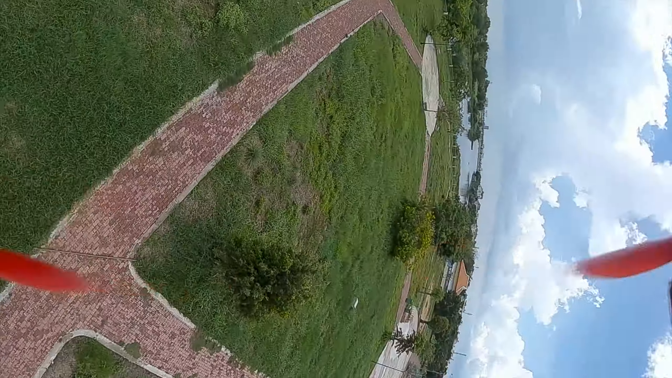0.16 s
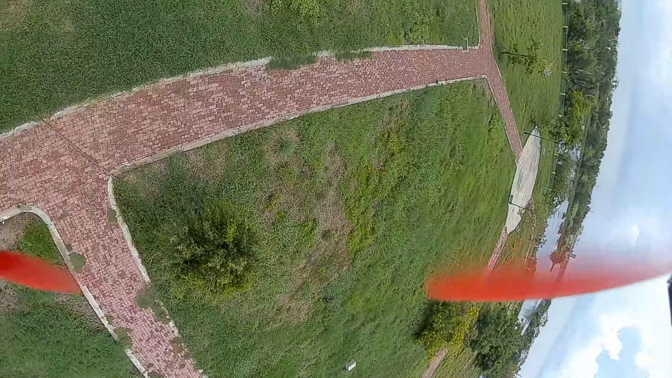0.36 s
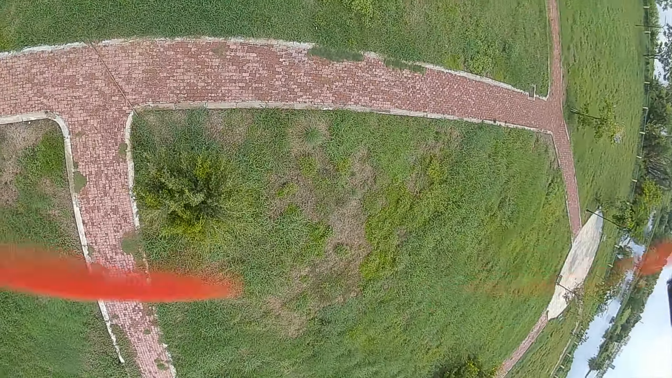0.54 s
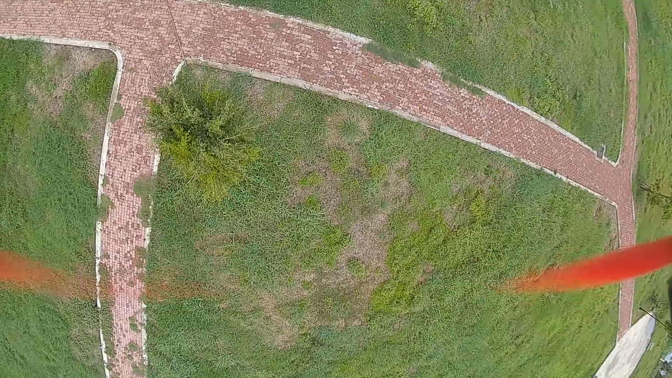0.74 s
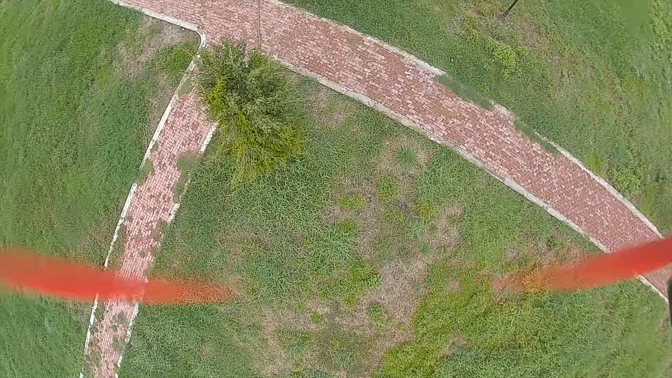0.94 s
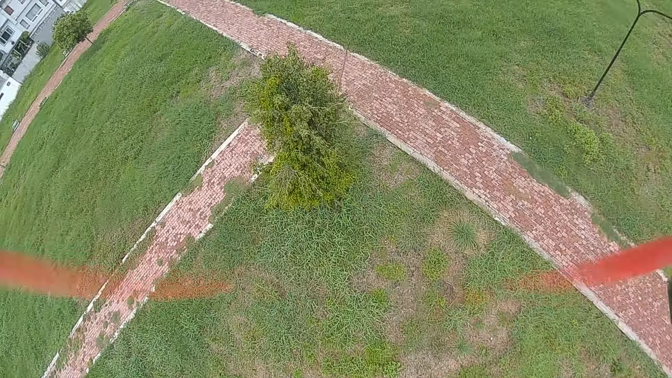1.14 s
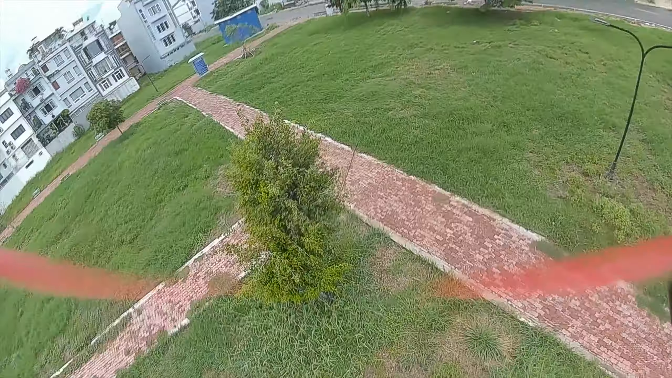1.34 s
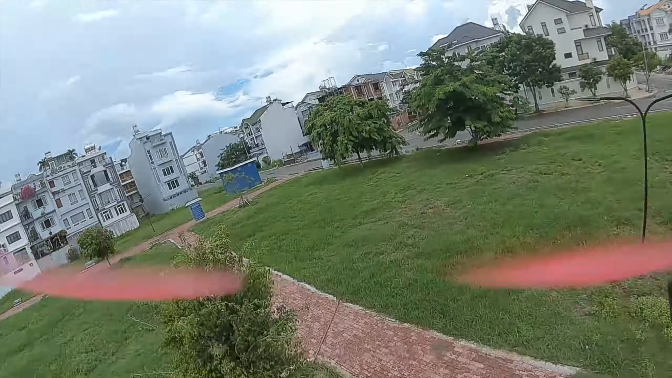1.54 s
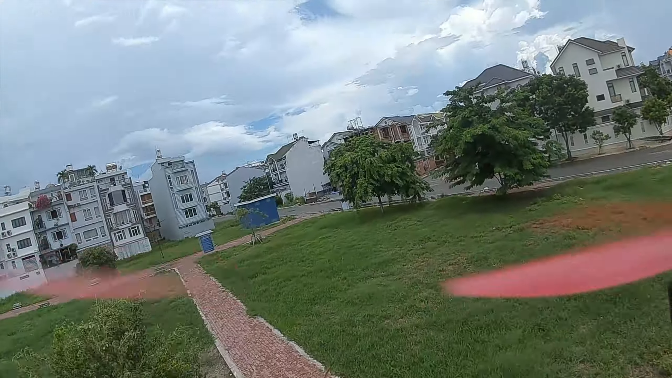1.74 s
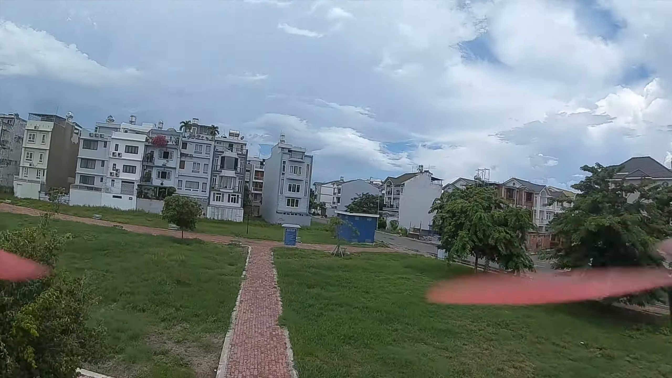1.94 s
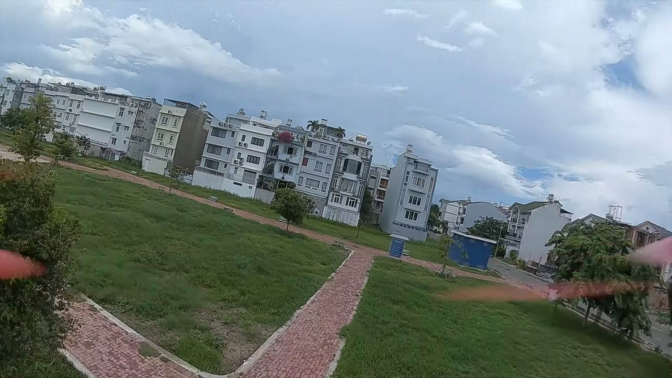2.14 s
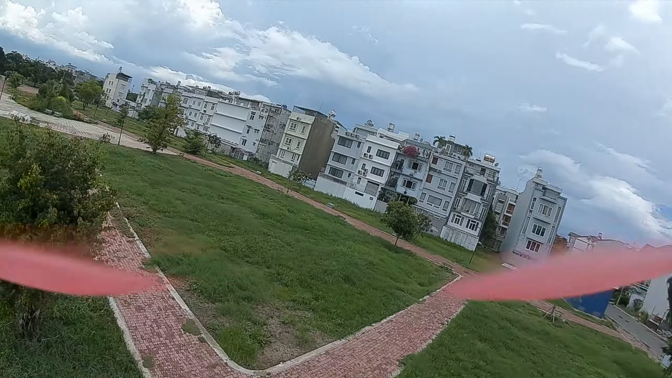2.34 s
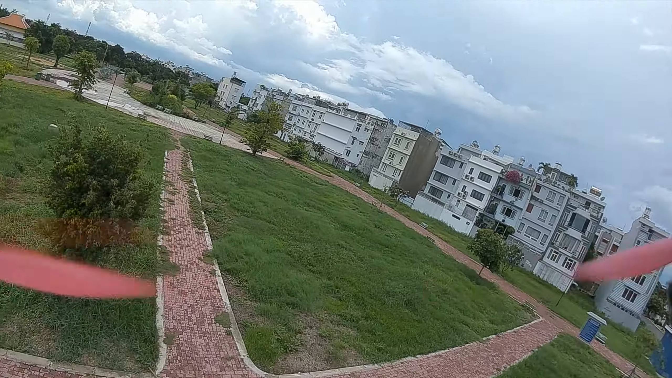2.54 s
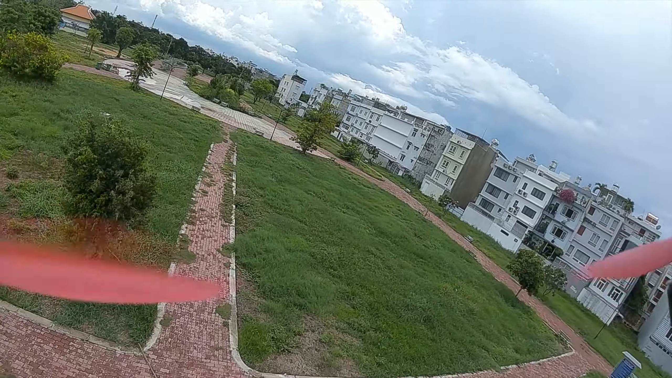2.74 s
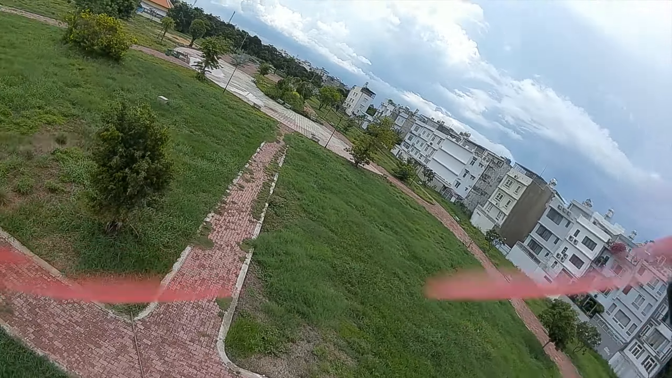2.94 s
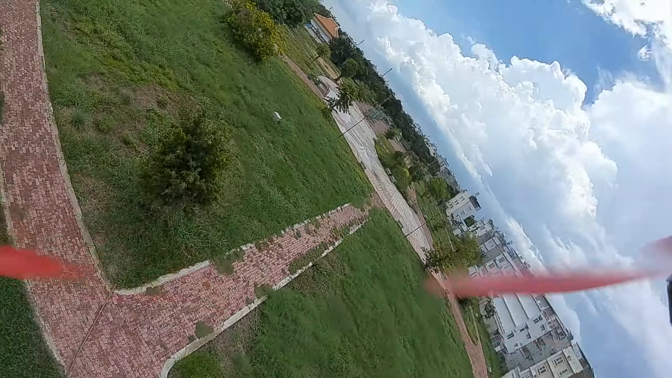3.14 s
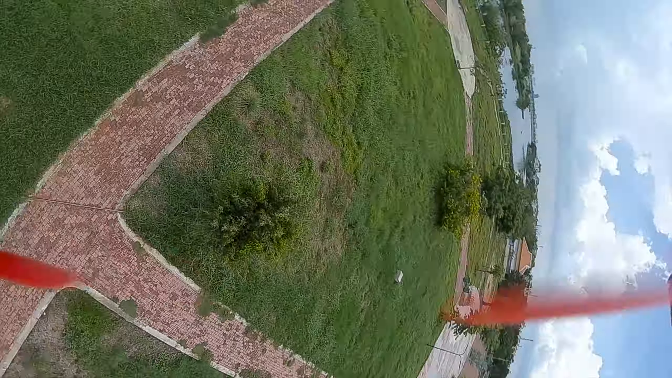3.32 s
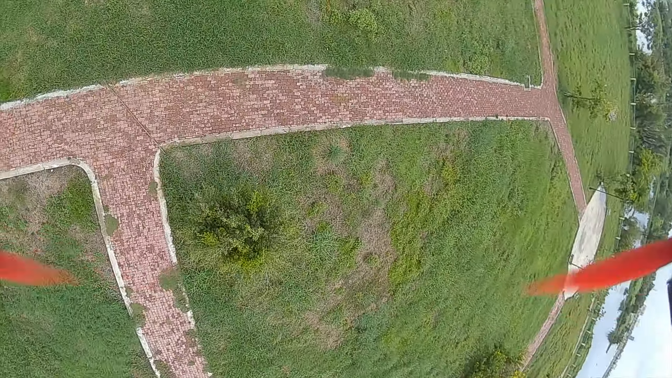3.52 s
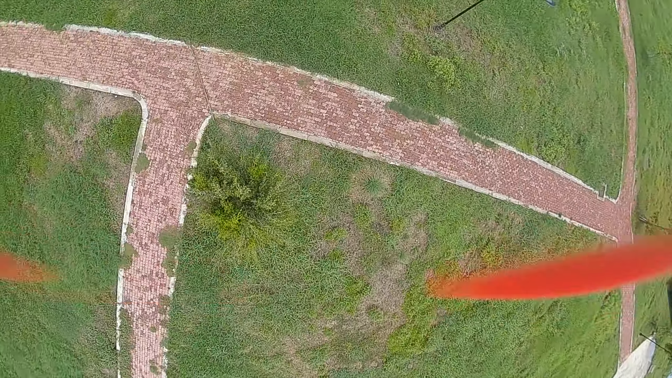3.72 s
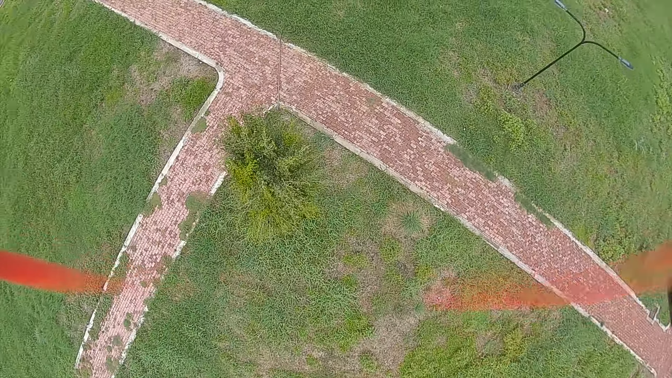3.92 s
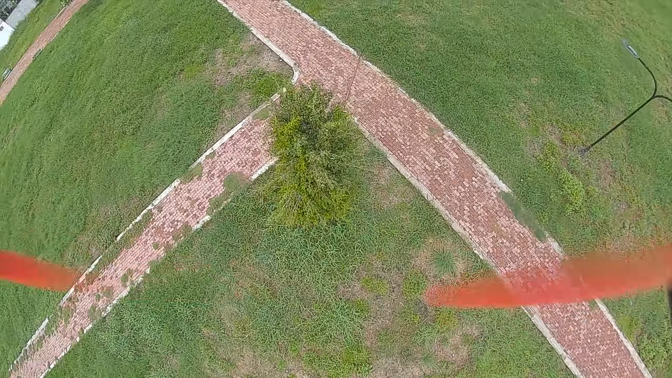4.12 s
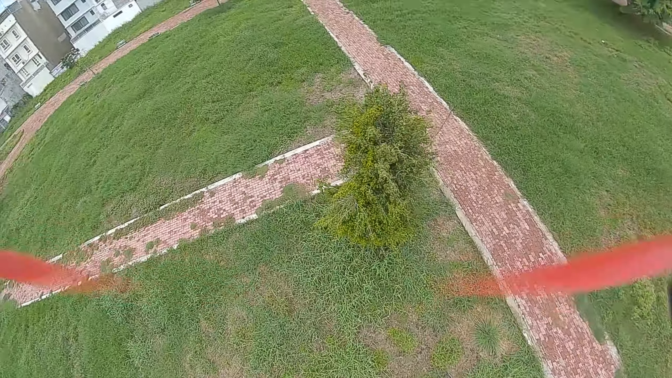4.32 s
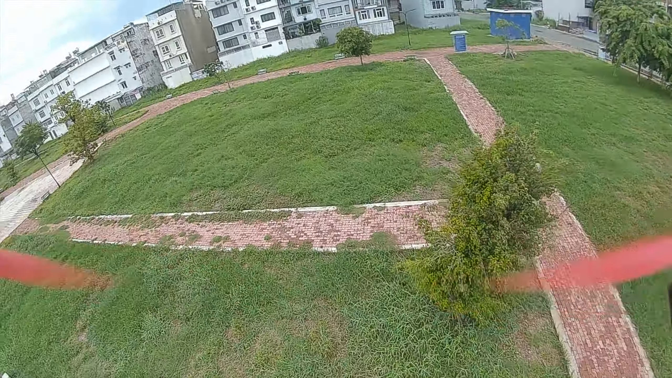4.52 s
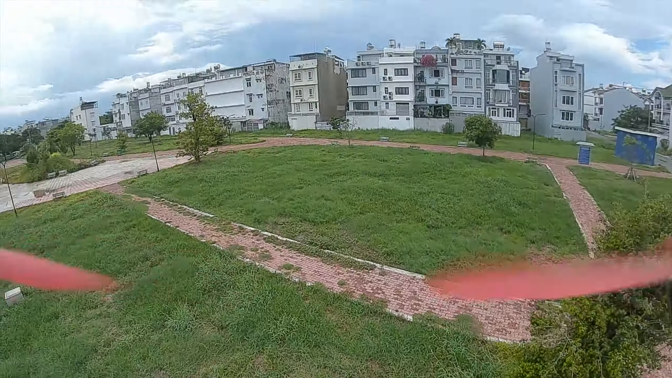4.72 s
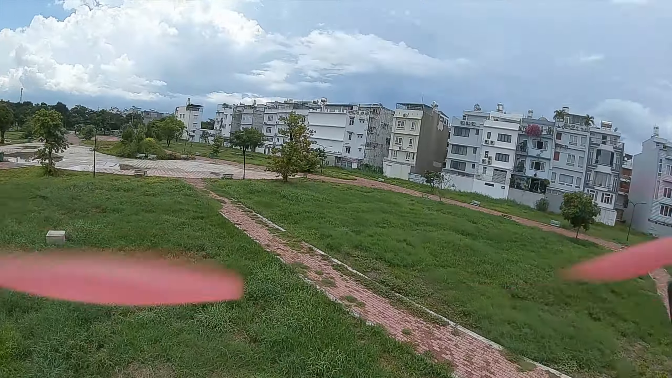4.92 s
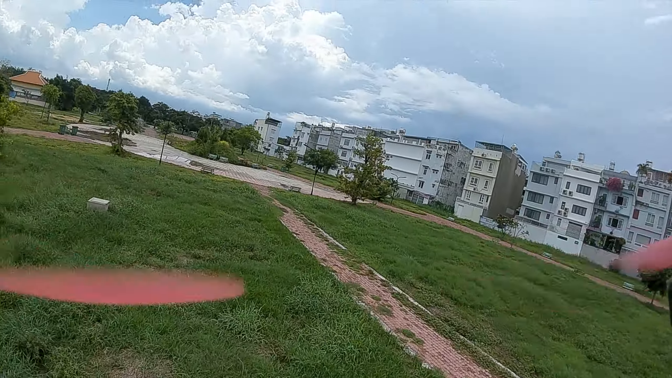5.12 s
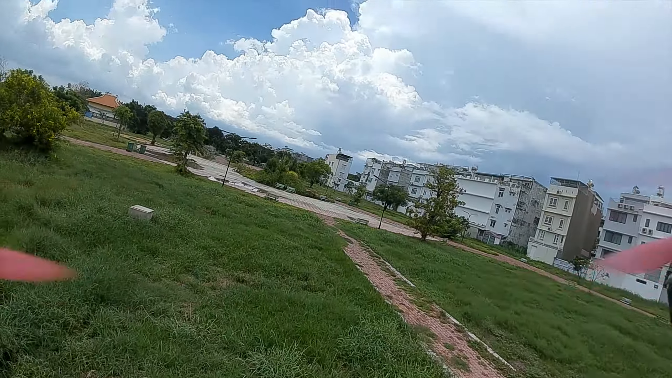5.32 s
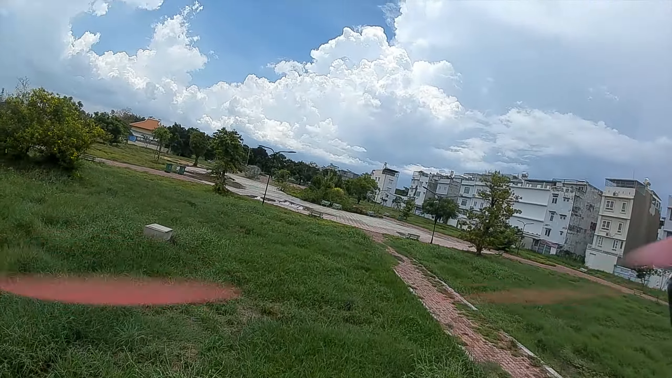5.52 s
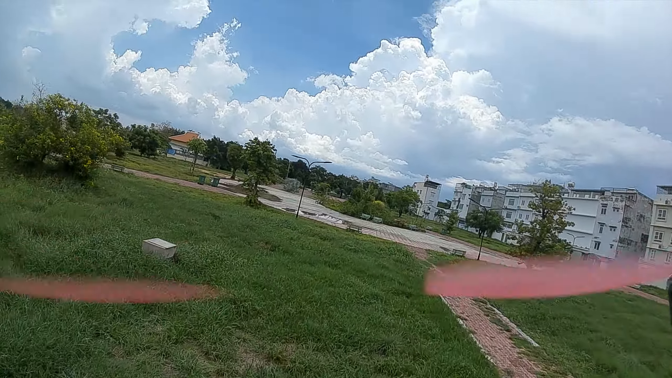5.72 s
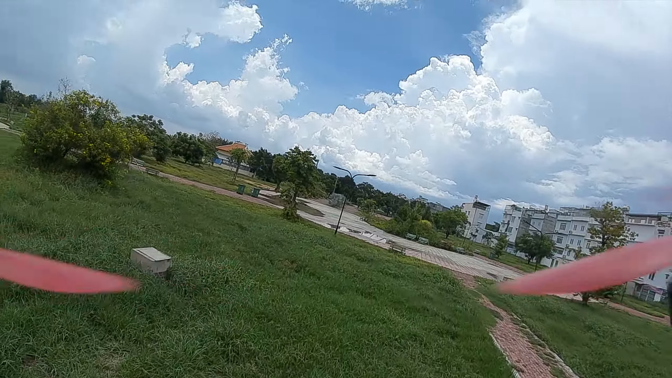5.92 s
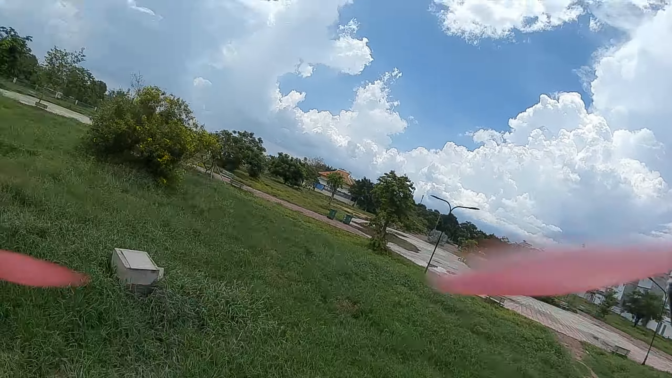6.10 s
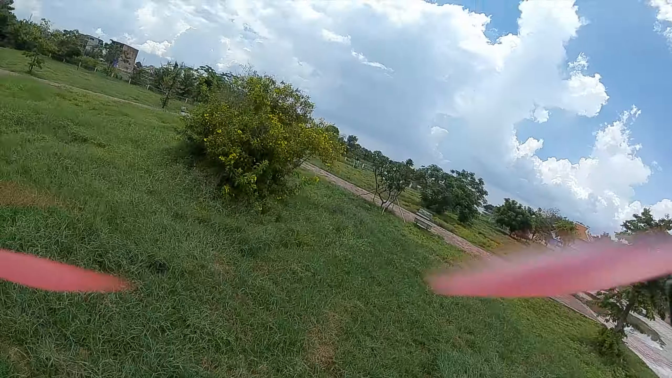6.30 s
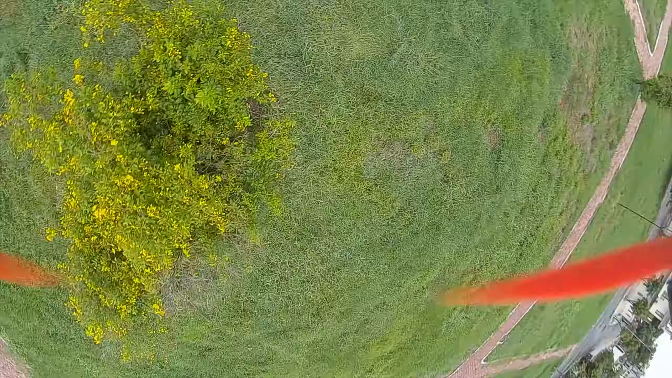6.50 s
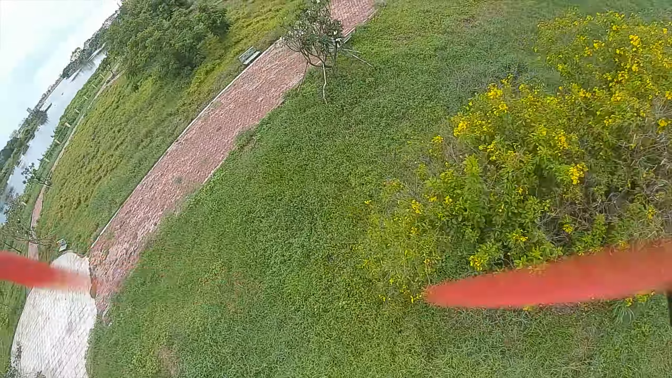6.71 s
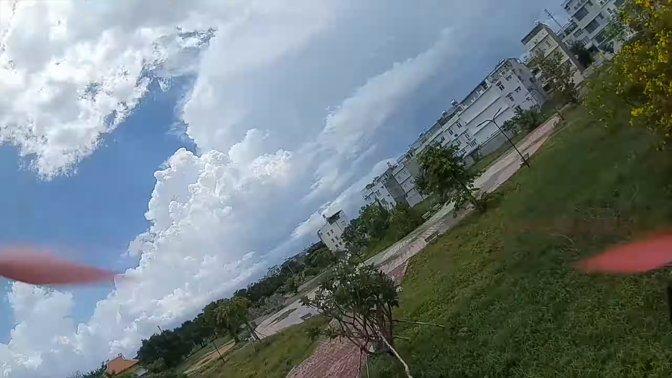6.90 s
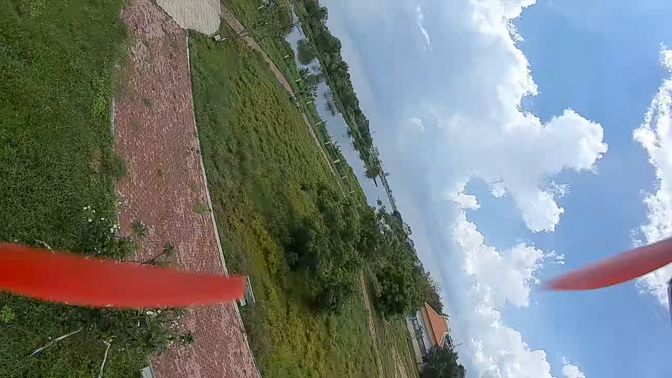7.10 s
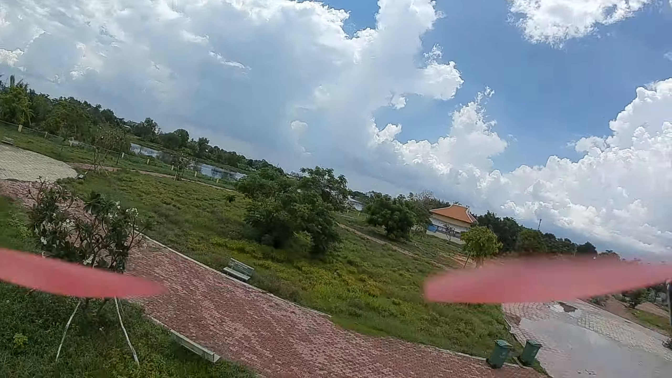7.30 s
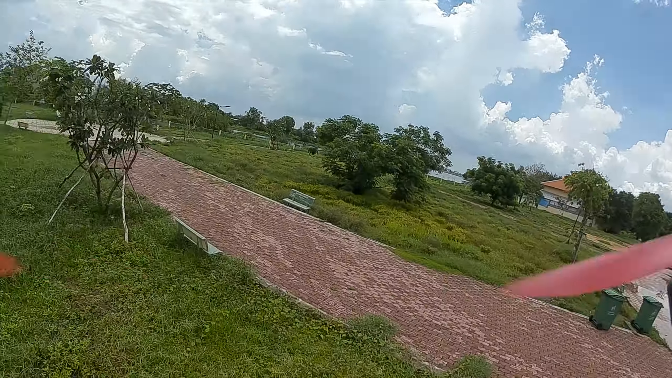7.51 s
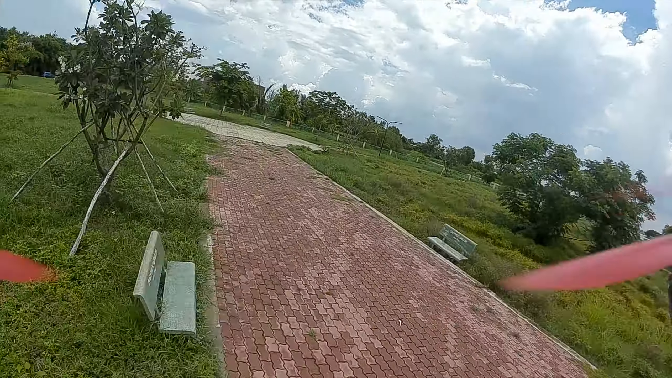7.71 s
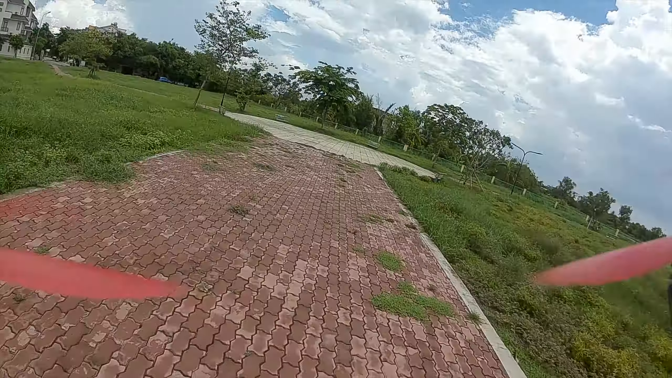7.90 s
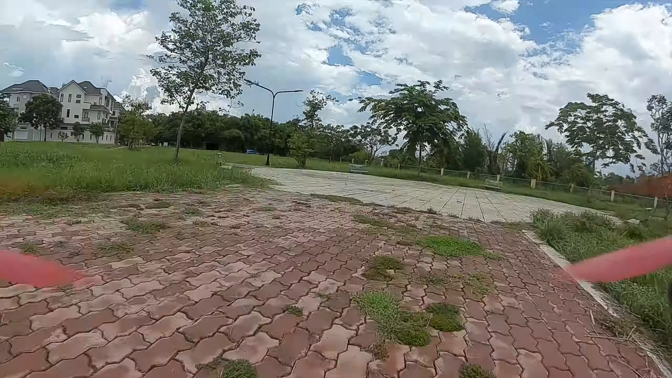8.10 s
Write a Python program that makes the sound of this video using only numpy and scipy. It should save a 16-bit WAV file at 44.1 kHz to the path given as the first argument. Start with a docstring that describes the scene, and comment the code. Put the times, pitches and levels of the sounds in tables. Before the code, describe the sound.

A small racing drone's propellers whine and roar, heard from on board, surging through loops, then suddenly shrilling two octaves higher in a sped-up finish.

```python
"""A small racing quadcopter flies loops round a park, heard from the camera on its own frame.
From the start, four propellers in a faster and a slower pair drone, summed from sine waves that follow the motors.
Each push on the throttle sweeps them up; shaped noise makes the roar and hiss, rougher with steering,
and ticks, low blasts, wind and a thin motor whine join in. Near the end the flight runs at four times
the pace: the motor tones, the frame resonances and the colours of the noise then lie two octaves up."""
import sys
import numpy as np
from scipy import signal
from scipy.fft import rfft, irfft, next_fast_len
from scipy.io import wavfile
from scipy.ndimage import map_coordinates

SR = 44100
rng = np.random.default_rng(int(sys.argv[2]) if len(sys.argv) > 2 else 0)


def to_wav(sig):
    """Store sig (one row per channel, or 1-D mono) as 16-bit WAV at the path in sys.argv[1].

    Samples outside -1..1 are clipped; the rate is SR.
    """
    pcm = np.clip(np.atleast_2d(sig), -1, 1) * 32767
    pcm = np.round(pcm).astype(np.int16)
    wavfile.write(sys.argv[1], SR, pcm.T)  # frames by channels


N = 359415

HURRY_S, HURRY_PACE = 6.143, 4  # when the flight speeds up, and how many times faster it then runs
TIME = np.arange(N) / SR  # seconds
PACE = np.where(TIME < HURRY_S, 1, HURRY_PACE)
FLOWN = np.cumsum(PACE) / SR  # seconds of flight
TOP_HZ = 15800  # upper band limit

# All motor speeds below are those at normal pace. The noise spectra give only the shape, not the loudness.
# Gliding and cruising between pushes. Each row: time in seconds, faster pair in turns per second,
# slower pair in turns per second, blade load in dB.
CRUISE = [(0, 185, 120, 8), (.36, 190, 116, -0.5), (.5, 240, 127, -1), (.82, 207, 154, -0.5),
          (.93, 246, 215.6, -3.5), (1.65, 220, 186, 5.5), (1.8, 212, 119, 3), (1.99, 192, 128, 5.5),
          (2.7, 166, 140.4, 0), (2.9, 164, 122, -1.5), (3.0, 235, 194, 7), (3.36, 267, 135, 3.5),
          (3.45, 227, 115, -2.5), (3.5, 135, 69, 1.5), (3.54, 133, 99, -4), (3.715, 138, 94, -4),
          (3.745, 174, 108.5, -1.5), (4.2, 173, 121, 0.5), (4.48, 251, 195, -3.5), (5.12, 233, 170, 2),
          (5.93, 127, 120, 3), (6.34, 141, 129, 3), (6.57, 126, 90, -2), (6.74, 162, 107, -5),
          (6.8, 164, 126, 2), (6.87, 172, 155, 3), (7.05, 243, 129, 3.5), (7.095, 131, 83, -3.5),
          (7.352, 130, 86, -5.5), (7.405, 190, 169, -7), (7.56, 115, 109, 0.5), (7.63, 152, 147, -1.5),
          (7.75, 159, 146, -2), (7.89, 112, 108, 3.5), (7.95, 151, 143, 2.5), (8.15, 153, 154, 8)]
CRUISE_SHARE = 0.34  # the faster pair's share of the power while cruising, 0-1
# Pushes on the throttle. Each row: time of the top in seconds, rise in seconds, fall in seconds, flatness of
# the top (no unit), faster pair in turns per second, slower pair in turns per second, blade load in dB,
# the faster pair's share of the power from 0 to 1, extra turbulence on a 0-1 scale.
PUSHES = [(0.15, .15, .15, 1.98, 283, 237, 1, 0.5, 0.28), (0.0, .1, .15, 1.51, 406, 329, 4.5, 1, -0.19),
          (1.62, 0.45, 0.17, 1.74, 351, 336, 1, .58, -0.11),
          (2.53, .62, .19, 2.8, 231, 198, 4, 0.44, -0.075),
          (3.13, .215, 0.19, 3.08, 387, 300, 0, 0.94, -0.3024),
          (3.427, 0.024, 0.058, 2.46, 269, 129, 6, .55, -.3),
          (4.72, .26, 0.38, 5.75, 274, 218.7, -0.5, 0.21, -0.13),
          (5.09, .13, .14, 3.95, 235, 169.4, 0.5, .12, -.32), (5.3, .17, .74, 1.42, 259, 224, 0, 0, -0.198),
          (5.3, .14, .2, 4, 266, 233, 1, .02, -.1), (6.2, 0.24, .15, 2.91, 182, 165.5, 1.5, 0.3, -0.15),
          (6.433, .063, 0.066, 3.08, 408, 304, 3, .92, -.35),
          (6.545, .018, .022, 1.6, 265, 152, 5.5, 0.42, -.1),
          (6.988, .132, .052, 2.6, 393, 305, 3, 0.87, -.1),
          (7.444, .046, .056, 3.35, 286, 264, 0, 0.42, 0.022),
          (7.685, 0.066, 0.067, 3, 254, 247, 0.5, 0.77, -0.044),
          (8.1, .13, .2, 2.7, 206, 190, 1.5, 0.41, -0.024)]
# The level dips or swells briefly. Each row: time in seconds, change of blade load in dB.
LURCHES = [(.1, -7.5), (1.25, 3.5), (1.88, -7.5), (2.55, 4), (3.402, -1.5), (4.495, -3.5), (4.71, 5),
           (5.005, 2.5), (5.225, 2.5), (5.63, -5), (5.835, -4), (6.13, 4.5), (6.4, 2), (6.512, 2.5),
           (6.865, -3.5), (7.5, -4.5)]
LURCH_S = 0.014  # half-length in seconds
# Faster blades are louder. Each row: mean speed in turns per second, thrust in dB, blade hiss in dB
# (both before steering, load and the trims of each layer).
LOUDNESS = [(102, -39.5, -46), (120.8, -26, -48), (178, -22.5, -43.5), (214.5, -20, -39.5),
            (255.4, -13, -32), (345, -13.5, -29), (415, -16, -44.5)]
# Steering is the gap between the pairs as a share of the faster one's speed.
# It unloads the blades and throws them into their own wake.
STEER_THRUST_DB, STEER_HISS_DB = -14.5, -8.5  # change at a gap of 1
CALM_TURBULENCE, STEER_TURBULENCE = 0.1123, 1.45  # turbulence 0-1 at no gap, and its growth with the gap
HISS_FOLLOWS_LOAD = 0.9  # dB of hiss per dB of blade load
# Tones of one propeller. Each row: multiple of the shaft speed, relative level in dB.
ORDERS_DB = [(1, -2.5), (2, 2), (3, -3), (4, -3), (5, -10.5), (6, -13), (7, -17), (8, -16), (9, -21.5),
             (10, -18.5), (12, -15.5)]
# Path through the frame and camera case. Each row: frequency in Hz at normal pace, gain in dB.
BODY = [(60, -19), (100, -14.5), (125, -12.5), (150, -14.5), (180, -19.5), (225, -12), (255, -12.5),
        (295, 4), (375, -3.5), (450, 0.5), (560, -0.5), (680, 0), (830, -7.5), (1020, -2), (1200, -4.5),
        (1400, -11.5), (1600, -9), (2500, -20), (5000, -24)]
CLEAN_EDGE_DB = 2.6  # dB per octave gained by the upper orders in clean air, lost in full turbulence
# Blade hiss at low throttle rings in the case. Each row: frequency in Hz, relative level in dB per Hz.
SOFT_HISS = [(1000, -24.5), (2000, -1), (2350, -4), (2600, -1.5), (2950, 5), (3500, 1.5), (4000, -10.5),
             (4500, -2.5), (5000, -11), (5600, -2.5), (6700, -9), (7500, -16.5), (9500, -19.5),
             (11000, -10.5), (12300, -23), (15500, -25)]
# Blade hiss at high throttle. Each row: frequency in Hz, relative level in dB per Hz.
HARD_HISS = [(900, -26), (1700, 8), (2400, 0), (3200, -1), (3900, -2), (5600, 1.5), (6600, -3),
             (7500, -10.5), (9700, -6), (11200, -11), (12500, -15), (15500, -17.5)]
# Churned air. Each row: frequency in Hz, relative level in dB per Hz.
WASH = [(15, -75), (60, -47), (250, -5), (380, -24.5), (520, 1), (720, -0.5), (850, 2.5), (1050, -1.5),
        (1400, -7.5), (2000, -15.5), (3500, -40), (8000, -70)]
# Blades striking their own wake. Each row: frequency in Hz, relative level in dB per Hz.
WAKE = [(8, -80), (30, -41), (100, -20), (170, -31), (215, -12), (280, 9), (380, 1.5), (520, 5),
        (700, -4.5), (1000, -27.5), (1500, -33), (3000, -60), (6000, -70)]
WHINE_DB, SQUEAL_S = -63, 0.026  # gain of the whine before its wobble and filter; half-length of a squeal in s
# The whine flares as the motors brake. Each row: time in seconds, dB over the usual.
SQUEALS = [(3.358, 25.5), (3.425, 16)]
# How the case passes the whine. Each row: frequency in Hz, gain in dB.
WHINE_CASE = [(2500, -10), (3800, -4), (4500, -6), (5000, 3), (5600, 7.5),
              (6400, -17), (7400, -11), (8300, -8), (11000, -11), (15000, -20)]
# Loud sharp ticks in the frame. Each row: time in seconds, strength in dB before a trim.
TICKS = [(0.019, -8.5), (0.0648, -21), (0.1421, -12.5), (1.4254, -20), (1.479, -17), (1.6811, -9.5),
         (2.9667, -20), (3.1488, -7.5), (5.4634, -24)]
# Colour of the ticks. Each row: frequency in Hz, relative level in dB per Hz.
TICK_COLOUR = [(1500, -32), (4000, -17), (5600, 1), (7500, -6.5), (10500, -3), (12500, -17), (15500, -20)]
# Low blasts as the craft drops through its own wake. Each row: time in seconds, level in dB.
BLASTS = [(.03, -14.5), (.165, -16.5), (3.0, -28), (3.156, -17), (3.255, -20.5)]
BLAST_S = 0.032  # half-length in seconds
# Colour of a blast. Each row: frequency in Hz, relative level in dB per Hz.
BLAST = [(60, -49), (150, -32.5), (200, -3.5), (270, 18.5), (330, 8), (450, -22), (1000, -60)]
# Air on the microphone. Each row: time in seconds, level in dB before a trim and a wobble.
WIND = [(0, -46), (.16, -62), (.72, -46), (1.3, -61), (1.45, -53), (1.77, -82), (2.36, -52.5), (2.88, -54),
        (3.33, -61), (3.75, -58), (4.18, -52), (4.47, -50.5), (5.22, -52), (5.67, -81), (6.14, -60),
        (6.3, -69), (7.0, -53.5), (7.25, -66), (7.42, -53.5), (7.56, -90), (8.15, -88)]
# Colour of the wind. Each row: frequency in Hz, relative level in dB per Hz.
RUMBLE = [(5, -25), (15, -21), (35, -0.5), (70, -1.5), (120, 9), (250, -9), (600, -50)]
# Narrow ring of the camera case. Each row: frequency in Hz, relative level in dB per Hz.
CASE_RING = [(500, -27), (900, -9), (1030, -2), (1130, -13), (1700, -30), (4000, -70)]


def amp(db):
    """Turn decibels into a gain."""
    return np.exp(np.asarray(db) * np.log(10) / 20)


def unit(x):
    """Scale x to an rms (average strength) of 1."""
    return x / np.sqrt(np.mean(x ** 2) + 1e-20)


def along(points, hz):
    """Read a value between (Hz, value) points on a log axis."""
    f, v = np.transpose(points)
    return np.interp(np.log(hz + 1), np.log(f + 1), v)


def curves(rows):
    """Give one value per sample for each column after the time."""
    s, *cols = np.transpose(rows)
    return [np.interp(TIME, s, c) for c in cols]


def bumps(rows, width_s):
    """Add up a bell-shaped rise or dip for each (seconds, height) row."""
    return sum(height * np.exp(-((TIME - s) / width_s) ** 2) for s, height in rows)


def wobble(rate):
    """Draw a smooth random curve of rms 1 through `rate` random points per second of flight."""
    knots = rng.standard_normal(int(FLOWN[-1] * rate) + 4)
    s = np.linspace(0, FLOWN[-1], len(knots) * 4)
    smooth = map_coordinates(knots, [s * rate])
    return unit(np.interp(FLOWN, s, smooth))


def filtered(x, response):
    """Multiply the spectrum of x by a response that depends on frequency."""
    m = next_fast_len(N + SR // 4)
    spectrum = rfft(x, m) * response(np.fft.rfftfreq(m, 1 / SR))
    return irfft(spectrum, m)[:N]


def rush(spectrum):
    """Make noise of about rms 1 whose spectrum moves up with the pace."""
    m = next_fast_len(N)
    white, hz = rfft(rng.standard_normal(m)), np.fft.rfftfreq(m, 1 / SR)

    def at_pace(pace):
        shaped = irfft(white * amp(along(spectrum, hz / pace)), m)[:N]
        return shaped / np.sqrt(pace)  # the wider band would be stronger

    slow, fast = at_pace(1), at_pace(HURRY_PACE)
    return np.where(PACE == 1, slow, fast) / np.std(slow)


def flight():
    """Motor speeds, blade load, share and extra turbulence: a push arches from the cruise to its top and back."""
    state = np.array(curves(CRUISE) + [np.full(N, CRUISE_SHARE), np.zeros(N)])
    for s, rise, fall, flatness, *top in PUSHES:
        near = (TIME > s - rise) & (TIME < s + fall)
        away = np.maximum((s - TIME[near]) / rise, (TIME[near] - s) / fall)  # 0 at the top, 1 at the ends
        arch = (1 - away ** flatness) ** 2
        state[:, near] += arch * (np.array(top)[:, None] - state[:, near])
    return state


def effort(fast, slow, load_db, stir):
    """Thrust dB, hiss dB and turbulence follow from the mean motor speed, the steering and the blade load."""
    speed, steering = (fast + slow) / 2, np.abs(fast - slow) / fast
    revs, thrust_law, hiss_law = np.transpose(LOUDNESS)
    thrust_db = np.interp(speed, revs, thrust_law) + STEER_THRUST_DB * steering + load_db
    hiss_db = np.interp(speed, revs, hiss_law) + STEER_HISS_DB * steering + HISS_FOLLOWS_LOAD * load_db
    rough = np.clip(CALM_TURBULENCE + STEER_TURBULENCE * steering + stir, 0, 1)
    return thrust_db, hiss_db, rough


def shaft(speed, drift, drift_rate, jitter):
    """Angle of one motor, in radians: its speed drifts slowly and shakes quickly by the given shares."""
    hz = speed * (1 + drift * wobble(drift_rate) + jitter * wobble(110))
    turns = np.cumsum(hz * PACE) / SR
    return (2 * np.pi * (turns % 1)).astype(np.float32)


def order_gains(speed, rough, size=64):
    """Gain of each shaft order, kept at one total power; each swells as it sweeps through a frame resonance."""
    order, db = np.transpose(ORDERS_DB)[:, :, None]
    rev = speed[::size]  # one value per block of samples is enough
    # slow blades and blades in turbulence sound rounder
    edge = 1.26 * np.log2(rev / 220) + CLEAN_EDGE_DB * (1 - 2 * rough[::size])
    octaves_up = np.log2(np.maximum(order / 2, 1))
    gain = amp(db + edge * octaves_up + along(BODY, order * rev))
    gain = gain / np.sqrt(np.sum(gain ** 2, 0) / 2)  # sines of these gains add up to rms 1
    return np.repeat(gain.astype(np.float32), size, axis=1)[:, :N]


def propeller(angle, gains, flutter_db):
    """Shaft orders of one propeller; uneven inflow loads the blades so that neighbouring orders flutter apart."""
    flutter = [unit(amp(flutter_db * wobble(38))).astype(np.float32) for _ in range(3)]
    tone = 0
    for i, ((order, _), gain) in enumerate(zip(ORDERS_DB, gains)):
        phase = float(rng.uniform(0, 2 * np.pi))
        tone = tone + gain * flutter[i % len(flutter)] * np.sin(round(order) * angle + phase)
    return tone


def rotors(fast, slow, share, rough):
    """Two pairs of motors; in each the farther one beats against the nearer. Returns drone and angles."""
    drone, angles = np.zeros(N), []
    share = np.clip(share, .03, .97)
    far_part = .12 + .22 * rough  # the farther motor's share of its pair's power
    flutter_db = 1.6 + 2.2 * rough
    for speed, part in ((fast, share), (slow, 1 - share)):
        near = shaft(speed, drift=.003 + .015 * rough ** 2, drift_rate=22, jitter=.003 + .02 * rough ** 2)
        far = shaft(speed, drift=.026 + .065 * rough, drift_rate=8, jitter=.004 + .03 * rough ** 2)
        gains = order_gains(speed, rough)
        drone += np.sqrt(part * (1 - far_part)) * propeller(near, gains, flutter_db)
        drone += np.sqrt(part * far_part) * propeller(far, gains, flutter_db)
        angles += [near, far]
    return drone, angles


def wash(thrust_db, rough):
    """Air churned by the thrust, louder in turbulence, with a lumpy roar where the blades strike their wake."""
    steady = amp(-11.0 + 3.45 * rough) * rush(WASH)
    wake = amp(-4.5 + 4.9 * wobble(40)) * rough * rush(WAKE)
    return amp(thrust_db) * (steady + wake)


def hiss(hiss_db, angles):
    """Blade tip noise, chopped in step with the blades; it turns from soft to hard as the hiss gets louder."""
    hardness = 1 / (1 + np.exp(-(hiss_db + 35) / 3))  # 0 soft, 1 hard
    fast_near, slow_near = angles[0], angles[2]
    chop = unit(1 + 0.26 * np.cos(2 * fast_near) + 0.14 * np.cos(2 * slow_near) + 0.19 * np.cos(slow_near))
    soft = amp(0.5) * rush(SOFT_HISS)
    hard = amp(3.0) * rush(HARD_HISS) * unit(amp(2.45 * wobble(300)))
    blend = np.sqrt(1 - hardness) * soft + np.sqrt(hardness) * hard
    return amp(hiss_db + 0.83 * wobble(38)) * chop * blend


def cogging(angles, speeds):
    """Magnets passing the stator teeth sing thinly at 42 and 84 times the shaft speed."""
    whine = np.zeros(N)
    for angle, speed in zip(angles, speeds):
        for k in (42, 84):
            in_band = k * speed * PACE < TOP_HZ
            whine += in_band * np.sin(k * angle)
    level = amp(WHINE_DB + bumps(SQUEALS, SQUEAL_S) + 6.3 * wobble(21))
    return level * filtered(whine, lambda hz: amp(along(WHINE_CASE, hz)))


def crackle(hiss_db, rough):
    """Sharp ticks as decaying noise: a few loud ones, and small random ones, denser when loud and rough."""
    rate = 45 * rough / (0.5 + np.exp(-(hiss_db + 40.0) / 3)) + 3.0  # ticks per second of flight
    ticks = (rng.random(N) < rate * PACE / SR) * amp(hiss_db - 2.5 + 5.7 * rng.standard_normal(N))
    for s, db in TICKS:
        ticks[int(s * SR)] += amp(db - 5.5)
    decay_s = 0.0022
    bursts = signal.lfilter([1], [1, -np.exp(-1 / (decay_s * SR))], ticks)
    return bursts * rush(TICK_COLOUR)


def blasts():
    """Short, low gusts of the craft's own wake: noise under bell-shaped swells."""
    return bumps([(s, amp(db)) for s, db in BLASTS], BLAST_S) * rush(BLAST)


def wind():
    """Air buffets the microphone: low noise that rises and falls."""
    wind_db, = curves(WIND)
    return amp(wind_db + 2.5 + 3.3 * wobble(12)) * rush(RUMBLE)


def case_ring():
    """A faint, steady, narrow ring of the camera case, made of noise."""
    return amp(-51.5) * rush(CASE_RING)


def scene():
    """Add up all layers; everything rides on the frame, so there is no distance and no echo."""
    fast, slow, load_db, share, stir = flight()
    load_db = load_db + bumps(LURCHES, LURCH_S)
    thrust_db, hiss_db, rough = effort(fast, slow, load_db, stir)
    drone, angles = rotors(fast, slow, share, rough)
    drone *= amp(thrust_db - 1.38 - 3.0 * rough ** 2)  # turbulence trades tone for roar
    air = wash(thrust_db, rough) + hiss(hiss_db, angles) + crackle(hiss_db, rough) + blasts() + wind()
    whine = cogging(angles, (fast, fast, slow, slow))
    return (drone + air + whine + case_ring())[None]


def record(dry):
    """The camera rounds off the highest peaks and keeps nothing above its band limit."""
    rounded = dry[0] / (1 + np.abs(dry[0] / .7) ** 8) ** (1 / 8)  # levels stay below 0.7
    return filtered(rounded, lambda hz: hz < TOP_HZ)[None]


dry = scene()
out = record(dry)
to_wav(out)
```